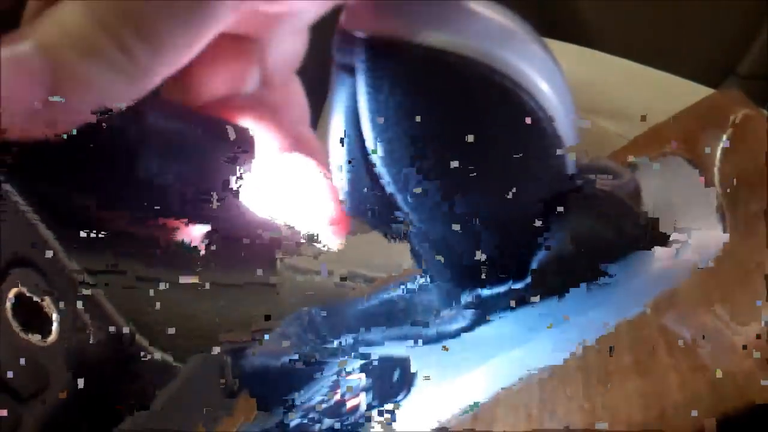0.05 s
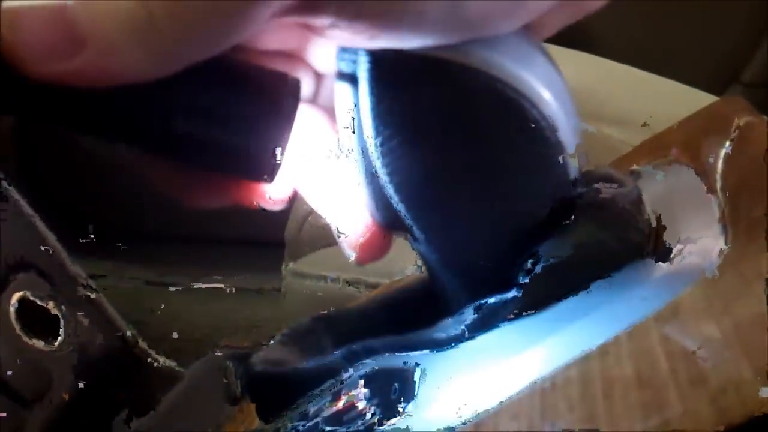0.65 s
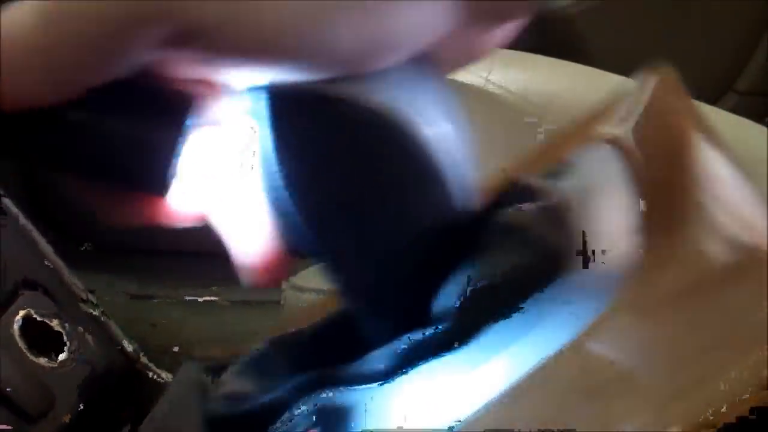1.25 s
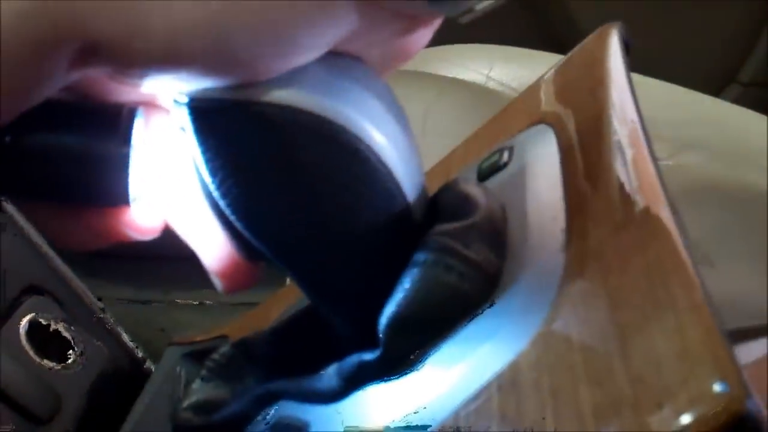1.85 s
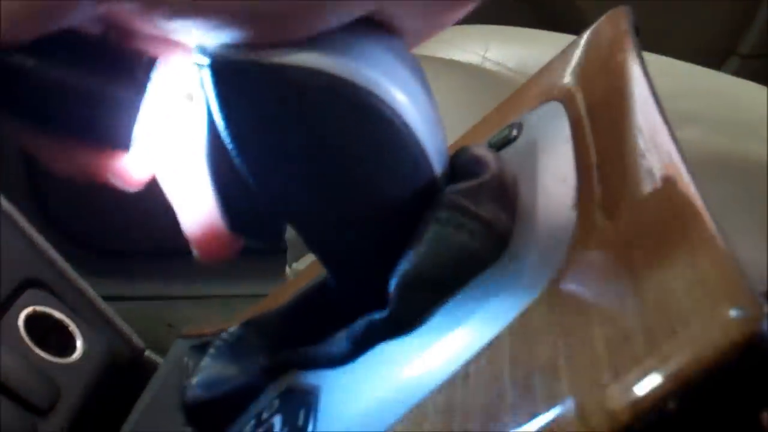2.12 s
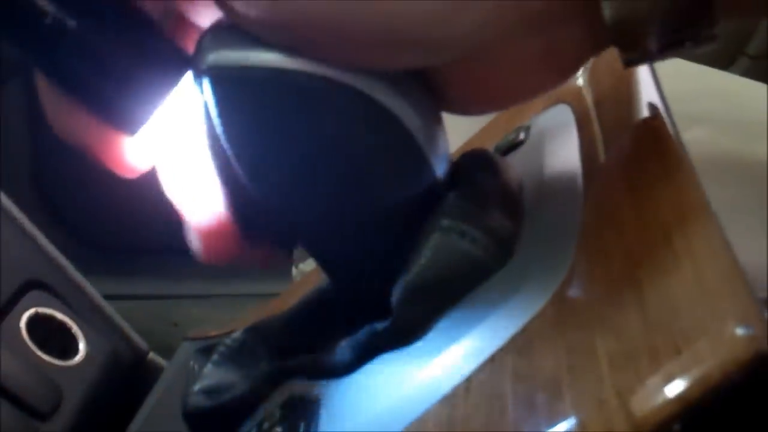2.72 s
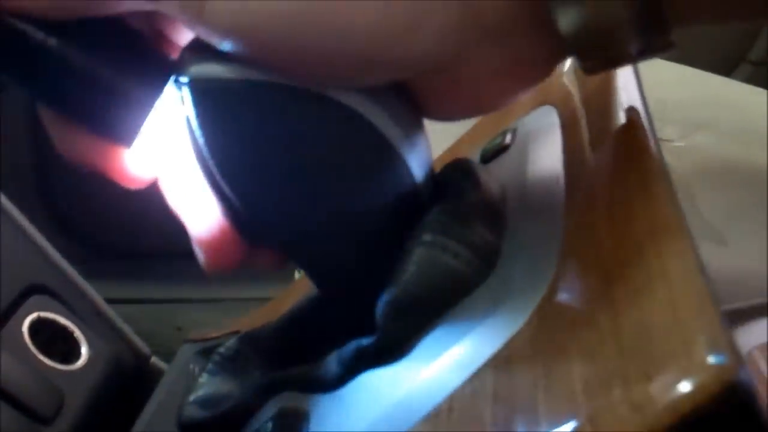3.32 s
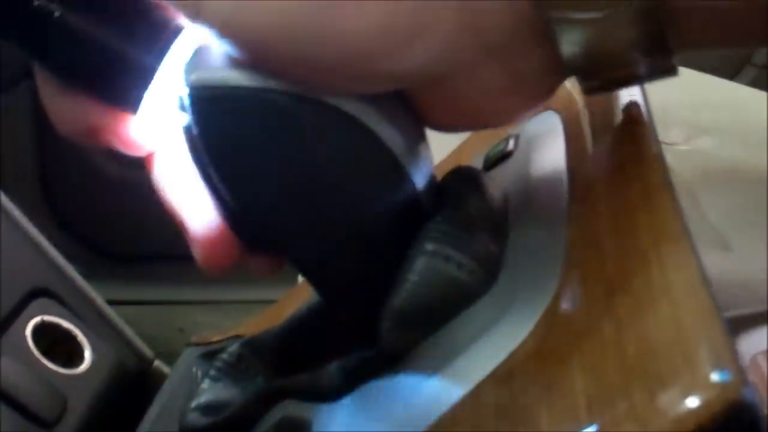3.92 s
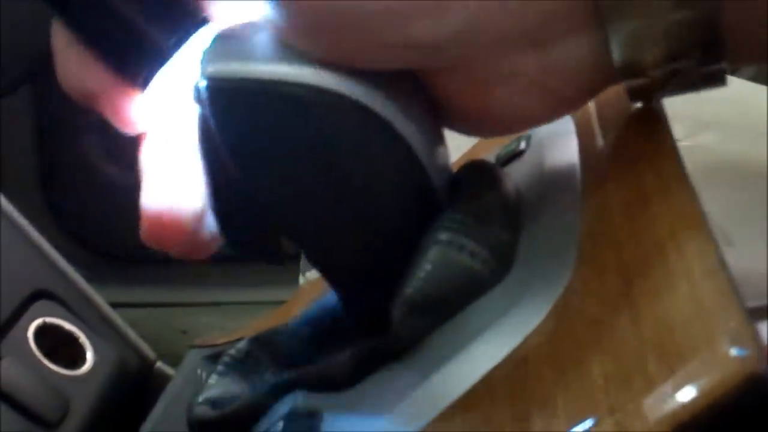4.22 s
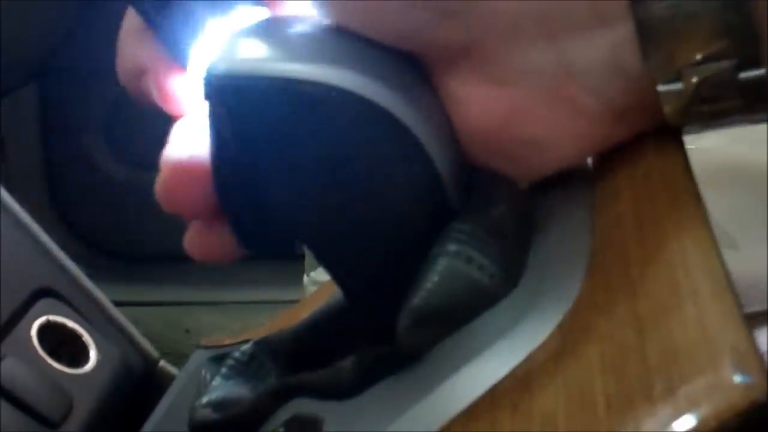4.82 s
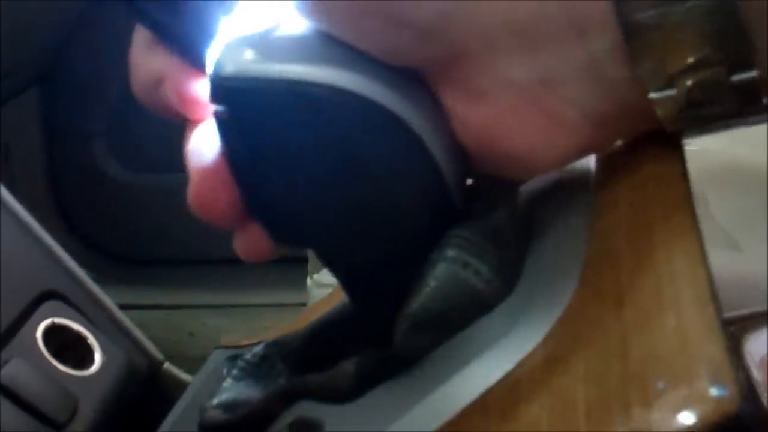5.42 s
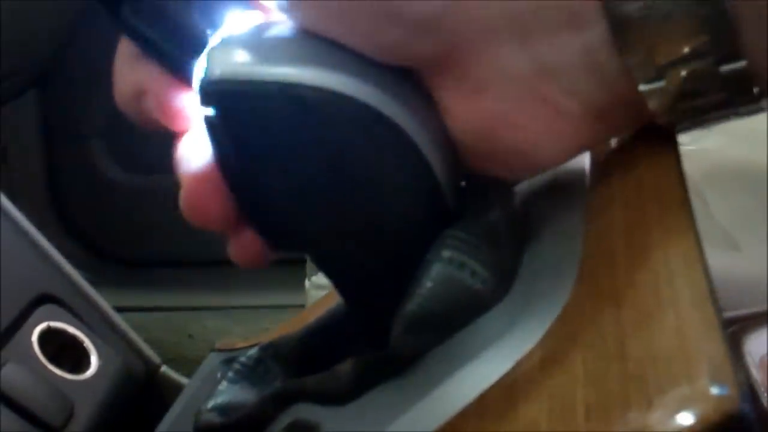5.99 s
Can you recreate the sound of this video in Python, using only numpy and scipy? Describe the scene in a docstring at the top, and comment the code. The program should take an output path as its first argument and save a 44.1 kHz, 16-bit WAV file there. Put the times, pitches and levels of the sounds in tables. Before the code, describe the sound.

A hand works the lock button of a gear lever in a parked car, close to the microphone. Light plastic ticks and sharp snaps come at uneven intervals, mixed with skin rubbing on the knob. Just after a second, a loud double click lands with a dull thump from the console. More clicks follow, growing busier near the end. The small cabin sounds dead, with faint hiss and hum.

```python
"""Gear lever lock button.

A hand works the lock button of an automatic gear lever in a parked car, close up. The plastic button
ticks as it takes up its play and snaps against its stop; hand and torch rub and bump on the knob, and
the console booms softly. The small cabin is dead, with a faint hum. The gain ducks after loud clicks."""
import sys
import numpy as np
from scipy import signal
from scipy.fft import rfft, irfft, next_fast_len
from scipy.io import wavfile
from scipy.ndimage import uniform_filter1d

SR = 44100
rng = np.random.default_rng(int(sys.argv[2]) if len(sys.argv) > 2 else 0)


def store_pcm(level_fs):
    """Save levels as 16-bit WAV."""
    pcm = np.round(np.clip(level_fs, -1, 1) * 32767).astype(np.int16)
    wavfile.write(sys.argv[1], SR, np.atleast_2d(pcm).T)


N = 266849
TIME_S = np.arange(N) / SR
CLICK_TIME_S = TIME_S[:SR // 14]

# Background hiss. Each row: frequency in Hz, relative density in dB.
AIR_SPECTRUM = [(15, -64), (25, -7.5), (264, -3), (363, -4.5), (414, 1.5), (511, -8), (569, -12), (616, -5),
                (781, -8.5), (3630, -16), (10200, -15.5), (14000, -12.5)]
# Garage hum. Each row: frequency in Hz, level in dB.
HUM_TONES = [(280, -70.5), (411, -65), (565, -65.5), (662, -89.5), (770, -73)]
# Stereo image of the noise. Each row: frequency in Hz, left-right correlation.
STEREO_CORRELATION = [(60, 0.95), (300, 0.9), (640, 0.74), (1400, 0.58), (3100, 0.16), (7000, 0)]
# Handling rumble. Each row: frequency in Hz, relative density in dB.
RUMBLE_SPECTRUM = [(15, -39.5), (30, -26), (60, -16), (90, -3.5), (130, -2.5), (270, 2), (420, -6),
                   (700, -7), (1500, -32), (4000, -23)]
# The hand shifts its grip. Each row: peak time in seconds, relative rumble level in dB.
GRIP_MOVES = [(0.73, -48), (0.8, -44.5), (1.04, -41), (1.289, -33), (1.412, -36.5), (1.66, -45),
              (1.829, -47.5), (2.052, -47), (2.191, -46), (3.301, -40.5), (4.08, -49), (4.42, -46.5),
              (5.45, -43), (5.769, -46.5)]
# Soft blows on the console. Each row: time in seconds, level in dB, knock pitch in Hz.
CONSOLE_BUMPS = [(0.207, -34.5, 250), (0.249, -48, 240), (1.051, -50, 276), (1.308, -23.5, 274),
                 (1.331, -23, 338), (1.352, -21, 334), (1.4, -31.5, 250), (1.652, -59, 129),
                 (1.857, -51.5, 85), (2.145, -47, 250), (2.215, -43.5, 85), (2.249, -40.5, 264),
                 (2.558, -42.5, 222), (3.252, -41, 560), (3.283, -38, 313), (3.549, -48.5, 288),
                 (4.814, -47, 318), (5.145, -34, 337), (5.401, -29, 412), (5.481, -33.5, 400)]
# Boom and knock bands. Each row: low edge in Hz, high edge in Hz.
BUMP_BANDS_HZ = [(60, 200), (200, 800)]
# Hand on knob and leather. Each row: peak time in seconds, length in seconds, level in dB,
# treble tilt in dB.
RUB_STROKES = [(0.395, 0.033, -37, -2.5), (0.757, 0.067, -59, 0), (1.052, 0.11, -49.5, -3),
               (1.266, 0.051, -35.5, -6), (1.305, 0.029, -19.5, -1), (1.35, 0.014, -20, -3),
               (1.411, 0.063, -40.5, -6.5), (2.175, 0.14, -48.5, 4), (3.64, 0.014, -36.5, 8.5),
               (4.419, 0.047, -40.5, -1), (4.576, 0.057, -36.5, -6), (4.728, 0.011, -48, 13),
               (5.145, 0.014, -26.5, -2), (5.392, 0.013, -35.5, 7), (5.404, 0.018, -34, -14),
               (5.486, 0.017, -29.5, -3.5), (5.756, 0.078, -56.5, 5)]
# Modes of console and cabin, lock linkage and hollow plastic knob.
# Each row: frequency in Hz, relative level in dB, T60 in seconds.
CONSOLE_RESONANCES = [(79, -1, 0.1), (127.9, 9, 0.17), (173.5, 3.5, 0.069), (209.7, 0, 0.085),
                      (274.5, -5, 0.16), (349.4, -5, 0.11), (421.5, -5.5, 0.065), (580, -1.5, 0.087),
                      (662, -8.5, 0.042)]
LINKAGE_RESONANCES = [(1024, -12, 0.0098), (1260, -2.5, 0.01), (1562, -4, 0.02), (1823, -2, 0.0093),
                      (2170, -7.5, 0.0062), (2995, -8, 0.02), (4244, -22.5, 0.03), (4770, -12, 0.018),
                      (6000, -14.5, 0.011), (7450, -3, 0.0082), (13100, -21, 0.028)]
KNOB_RESONANCES = [(1000, -17, 0.0088), (1424, 19.5, 0.0064), (1650, 5.5, 0.0058), (1700, 7.5, 0.0036),
                   (2410, -19, 0.0022), (3080, -3.5, 0.0073), (4266, 1, 0.0075), (4920, 2, 0.0077),
                   (5850, -4, 0.0086), (7300, -10.5, 0.0055), (12370, -8, 0.004), (12580, -12, 0.0064),
                   (13600, -9.5, 0.0052)]
# Body, edge, ping and crack of a click. Each row: low edge in Hz, high edge in Hz.
CLICK_BANDS_HZ = [(800, 2400), (2400, 3600), (3600, 6500), (6500, 15500)]
# Left over right in dB, per click band.
CLICK_PAN_DB = [.3, 1.6, 2.4, 3.399]
# Share of the contact hardness, per click band.
CLICK_HARDNESS_SHARE = [0, 0.3, 0.7, 1]
# Loose linkage chatter. Each row: start in seconds, gap between touches in seconds, level in dB.
LINKAGE_RATTLES = [(3.811, 0.007, -40.5), (4.033, 0.016, -40.5)]
# Light contacts of button and linkage. Each row: start in seconds, level in dB, hardness in dB,
# main ring in Hz.
BUTTON_TICKS = [(0.204, -27, 13.5, 1380), (0.2493, -29.5, 17.5, 1720), (0.3509, -40.5, -3, 4030),
                (0.383, -36.5, 9, 1280), (0.4096, -30, -14, 2230), (0.5076, -40.5, 12, 2120),
                (0.517, -43.5, -4, 1320), (0.7074, -51, 4, 1000), (0.9473, -49.5, 6, 1010),
                (1.0203, -43.5, 20, 1570), (1.0487, -34.5, 30, 1570), (1.0801, -43, 11, 1200),
                (1.239, -40, 3, 1920), (1.2998, -24.5, 11, 1290), (1.487, -44.5, 2, 1110),
                (1.782, -48, -13, 3140), (1.832, -47.5, 17, 1400), (2.0232, -43.5, -1, 1360),
                (2.1071, -36.5, 3, 1670), (2.188, -42, 4, 1550), (2.254, -34, -21, 1510),
                (2.405, -37, -7, 1550), (2.4215, -34, 9, 1630), (2.4424, -41, 4, 1570),
                (2.5216, -38.5, -7, 1910), (2.547, -36.5, -12, 1200), (2.7326, -33, -9, 1900),
                (2.8907, -32.5, 0, 1640), (3.1503, -40.5, 1, 2500), (3.1666, -30.5, 5, 3140),
                (3.2116, -31.5, -22, 2900), (3.54, -33, -2, 1980), (3.564, -42.5, 20, 1580),
                (3.6208, -38, -22, 1530), (3.641, -42.5, -17, 2300), (4.2126, -49, 6, 1840),
                (4.283, -48, 20, 1890), (4.3362, -30, 18, 2350), (4.4444, -36.5, 26, 1600),
                (4.5464, -27, -2, 1520), (4.589, -29.5, 17, 1570), (4.6606, -28.5, -2, 1110),
                (4.8019, -31, 7, 1540), (4.8459, -39.5, -10, 1580), (4.9002, -35, 1, 1630),
                (5.0109, -43, -2, 3000), (5.088, -32, 12, 1570), (5.102, -34.5, 7, 1550),
                (5.477, -31.5, 6, 1360), (5.5147, -32, 9.5, 1820), (5.5792, -40.5, -5, 1590),
                (5.7451, -36, 4.5, 1710), (5.906, -28, 1, 1430), (5.919, -32.5, 8, 1560)]
# Button and detent snapping home. Each row: start in seconds, landing delay in seconds, relative level
# in dB, hardness in dB, main ring in Hz, gain of that ring, relative housing level in dB.
BUTTON_SNAPS = [(0.3898, 0.00048, -26, 16, 1280, 0.62, -55), (1.3077, 0.00027, -21.5, -15, 1380, 0.1, -28),
                (1.346, 0.0011, -17.5, 12, 5260, 0.11, -31), (2.4732, 0.0025, -19, 8.5, 1680, 0.35, -44.5),
                (2.9138, 0.0009, -18, 5.5, 3840, 0.67, -42), (3.2513, 0.00043, -14, -5.5, 1440, 0.27, -29),
                (3.8538, 0.00083, -18, 0.5, 2610, 1.24, -45.5), (4.564, 0.00045, -16, -8, 1670, 1.7, -64),
                (4.599, 0.002, -15.5, 13.5, 1640, 0.5, -38), (4.9317, 0.0015, -18, 10.5, 1640, 0.34, -43),
                (5.9462, 0.0018, -18, 7.5, 4130, 0.4, -46)]


def from_db(db):
    return 10 ** (np.asarray(db) / 20)


def unit_rms(x):
    return x / np.sqrt(np.mean(x ** 2) + 1e-20)


def with_energy(x, db, span_s):
    """Scale x so its rms, spread over span_s, is db."""
    return x * from_db(db) * np.sqrt(span_s * SR / np.mean(np.sum(x ** 2, axis=-1)))


def pan(left_over_right_db):
    return from_db(np.array([[left_over_right_db], [-left_over_right_db]]) / 2)


def band(x, edges_hz):
    return signal.sosfilt(signal.butter(3, edges_hz, "band", fs=SR, output="sos"), x)


def fade(t, t60_s):
    return np.exp(-np.log(1000) * t / t60_s)


def swell(peak_s, rise_s, fall_s):
    """Exponential rise to 1 at peak_s, then exponential fall."""
    distance = np.maximum((peak_s - TIME_S) / rise_s, (TIME_S - peak_s) / fall_s)
    return np.exp(-np.minimum(distance, 20))


def at_hz(curve, hz):
    curve_hz, values = np.array(curve).T
    return np.interp(np.log(hz), np.log(curve_hz), values)


def add(track, start_s, sound):
    start = int(start_s * SR)
    track[:, start:start + sound.shape[-1]] += sound[..., :N - start]


def drift(rate_hz):
    """Random wander, rms 1."""
    return unit_rms(np.interp(TIME_S * rate_hz, np.arange(N), rng.standard_normal(N)))


def coloured_noise(spectrum):
    """Stereo noise, rms 1: correlated in the bass, independent in the treble."""
    size = next_fast_len(N)
    hz = np.maximum(np.fft.rfftfreq(size, 1 / SR), 1)
    mid, side = rfft(rng.standard_normal((2, size)))
    correlation = np.clip(at_hz(STEREO_CORRELATION, hz), 0, 1)
    stereo = np.sqrt(1 + correlation) * mid + np.sqrt(1 - correlation) * side * [[1], [-1]]
    rolloff_hz = 2 * spectrum[-1][0]
    gain = from_db(at_hz(spectrum, hz)) / (1 + (hz / rolloff_hz) ** 2)
    return unit_rms(irfft(stereo * gain, size)[:, :N])


def background(air_db=-52.0, waver_db=2.5):
    """Soft hiss and a wavering hum."""
    hum = np.zeros(N)
    for hz, db in HUM_TONES:
        amplitude = np.sqrt(2) * from_db(db + waver_db * drift(8.0))
        hum += amplitude * np.sin(2 * np.pi * hz * TIME_S + 1.5 * drift(17))
    return from_db(air_db) * coloured_noise(AIR_SPECTRUM) + hum


def cabin(x, early_db=-10.5, early_t60_s=0.072, late_db=-12.0, late_t60_s=0.2, late_cutoff_hz=1700):
    """Dense close reflections off the dashboard, then a tail dulled by the seats."""
    t = np.arange(SR // 3) / SR
    mid, side = rng.standard_normal((2, 2, len(t))) * (1 - np.exp(-(t / 0.0025) ** 2))
    # Long waves reach both microphones alike.
    side = signal.sosfilt(signal.butter(1, 2200, "high", fs=SR, output="sos"), side)
    early, late = np.stack([mid + side, mid - side], axis=1)
    early = with_energy(early * fade(t, early_t60_s), early_db, 1 / SR)
    late = with_energy(late * fade(t, late_t60_s), late_db, 1 / SR)
    late = signal.sosfilt(signal.butter(2, late_cutoff_hz, fs=SR, output="sos"), late)
    return x + signal.fftconvolve(x, early + late, axes=1)[:, :N]


def handling(gain_db=0.5, lumps_db=3.5, lump_rate_hz=35, rest_db=-67.0, push_db=-45.5, push_slope=0.22,
             rise_s=0.023, fall_s=0.048):
    """Lumpy rumble that swells with each grip shift and the push behind each click."""
    clicks = [(start_s, db) for start_s, _, db, *_ in BUTTON_SNAPS + LINKAGE_RATTLES]
    clicks += [(start_s, db) for start_s, db, *_ in BUTTON_TICKS]
    pushes = [(start_s + rise_s, push_db + push_slope * db) for start_s, db in clicks]
    effort = from_db(rest_db)
    for peak_s, db in GRIP_MOVES + pushes:
        effort = np.maximum(effort, from_db(db) * swell(peak_s, rise_s, fall_s))
    lumps = from_db(gain_db + lumps_db * drift(lump_rate_hz))
    return effort * lumps * coloured_noise(RUMBLE_SPECTRUM)


def bumps(rise_s=0.00233, crossover_hz=160, lean_db_per_octave=10.5, knock_db_per_octave=-13.0):
    """Soft blows ring the console and cabin air; where the hand lands sets the knock pitch."""
    out = np.zeros((2, N))
    t = np.arange(SR // 4) / SR
    hz, db, t60_s = np.array(CONSOLE_RESONANCES).T[:, :, None]
    onset = 1 - np.exp(-t / rise_s)
    for time_s, level_db, knock_hz in CONSOLE_BUMPS:
        strength, detune, start_cycles = rng.standard_normal((3, len(hz), 1))
        phase = 2 * np.pi * (hz * (1 + 0.044 * detune) * t + start_cycles)
        mic_phase = 0.16 * rng.standard_normal((2, len(hz), 1))
        modes = from_db(db + 2 * strength) * fade(t, t60_s) * np.sin(phase + mic_phase) * onset
        knock_weights = from_db(knock_db_per_octave * np.abs(np.log2(hz / knock_hz)))
        boom = band(modes.sum(axis=1), BUMP_BANDS_HZ[0])
        knock = band((modes * knock_weights).sum(axis=1), BUMP_BANDS_HZ[1])
        # Mostly boom below the crossover, mostly knock above.
        lean_db = lean_db_per_octave * np.log2(knock_hz / crossover_hz)
        boom = with_energy(boom, level_db - max(lean_db, 0), span_s=0.038)
        knock = with_energy(knock, level_db + min(lean_db, 0), span_s=0.035)
        add(out, time_s - rise_s, boom + knock)
    return out


def rubs(grain_db=3.5, grain_rate_hz=700, rise_share=0.37):
    """Skin and leather stick and slip: grainy friction that swells and dies with each stroke."""
    _, _, db, tilt_db = np.array(RUB_STROKES).T
    strokes = np.array([swell(peak_s, rise_share * length_s, (1 - rise_share) * length_s)
                        for peak_s, length_s, *_ in RUB_STROKES])
    scuff = coloured_noise([(300, -4), (650, -1.5), (1000, 7), (1600, 1.0), (3000, 2.5), (5000, -11),
                            (14000, -35)])
    hiss = coloured_noise([(1200, -27), (3000, -12), (5500, -3), (9000, -2.0), (14000, 2)])
    friction = scuff * (from_db(db) @ strokes) + hiss * (from_db(db + tilt_db) @ strokes)
    slips = np.minimum(drift(grain_rate_hz), 2)   # a slip can only release so much
    return friction * from_db(grain_db * slips) * pan(1.4)


def contact(modes, dense_db, dense_t60_s, grip_detune, rise_s, spread_db=4.5):
    """One contact: the part's modes, detuned by the grip, plus a burst of dense short ones."""
    t = CLICK_TIME_S
    hz, db, t60_s = np.array(modes).T[:, :, None]
    strength, detune, skew = rng.standard_normal((3, len(hz), 1))
    phase = 2 * np.pi * hz * (1 + grip_detune * detune) * t + np.pi * rng.integers(0, 2, hz.shape)
    amplitude = from_db(db + spread_db * strength) * fade(t, t60_s)
    mic_phase = skew * hz / 8000   # short waves reach the microphones out of step
    ring = np.array([np.sum(amplitude * np.sin(phase + sign * mic_phase), axis=0) for sign in (1, -1)])
    mid, side = rng.standard_normal((2, len(t)))
    dense = mid + 0.46 * np.diff(side, prepend=0) * np.array([[1], [-1]])
    return (ring + from_db(dense_db) * dense * fade(t, dense_t60_s)) * (1 - np.exp(-t / rise_s))


def contact_tone(ring, db, hardness_db, ring_hz, ring_gain, db_per_octave, relative_bandwidth=0.13):
    """The contact point favours one ring and nearby bands; a harder contact lifts the treble."""
    centres_hz = np.sqrt(np.prod(CLICK_BANDS_HZ, axis=1))
    octaves_away = np.abs(np.log2(centres_hz / ring_hz))
    levels_db = hardness_db * np.array(CLICK_HARDNESS_SHARE) + db_per_octave * octaves_away
    click = sum(with_energy(band(ring, edges_hz), band_db, span_s=1) * pan(pan_db)
                for edges_hz, band_db, pan_db in zip(CLICK_BANDS_HZ, levels_db, CLICK_PAN_DB))
    main_ring = signal.lfilter(*signal.iirpeak(ring_hz, 1 / relative_bandwidth, fs=SR), click)
    return with_energy(click + ring_gain * main_ring, db, span_s=0.01)


def housing(db, thud_t60_s, thud_db=-4.5, knock_hz=950, knock_t60_s=0.02):
    """A click passes down the lever: the casing knocks, the console thuds."""
    t = CLICK_TIME_S
    knock = np.sin(2 * np.pi * knock_hz * t) * fade(t, knock_t60_s)
    noise = unit_rms(band(rng.standard_normal(len(t)), (300, 1100)))
    thud = from_db(thud_db) * noise * fade(t, thud_t60_s)
    return with_energy(knock + thud, db, span_s=0.01)


def stray_touches(count=2, scatter_s=0.05, level_db=-51.0, hardness_db=11.0, ring_hz=1050):
    """Tick rows: each grip shift jogs faint ticks out of the lever."""
    return [(peak_s + scatter_s * jitter, level_db + 0.5 * strength,
             hardness_db, ring_hz * 2 ** (0.17 * detune))
            for peak_s, _ in GRIP_MOVES
            for jitter, strength, detune in rng.standard_normal((count, 3))]


def rattle_touches(count=4, hardness_db=-9.5, ring_hz=1650):
    """Tick rows: the loose linkage chatters in dull, nearly even runs."""
    return [(start_s + gap_s * (k + 0.13 * jitter), db + 2.0 * strength,
             hardness_db, ring_hz * 2 ** (0.23 * detune))
            for start_s, gap_s, db in LINKAGE_RATTLES
            for k, (jitter, strength, detune) in enumerate(rng.standard_normal((count, 3)))]


def ticks(housing_gain_db=-15.0):
    """Single contacts as button and linkage take up their play."""
    out = np.zeros((2, N))
    for start_s, db, hardness_db, ring_hz in BUTTON_TICKS + rattle_touches() + stray_touches():
        ring = contact(LINKAGE_RESONANCES, dense_db=0.0, dense_t60_s=0.013,
                       grip_detune=0.047, rise_s=0.00024)
        ring_gain = 0.42 * (ring_hz / 1500) ** 2   # high rings stand out more
        click = contact_tone(ring, db, hardness_db, ring_hz, ring_gain, db_per_octave=-7.0)
        add(out, start_s, click + housing(db + housing_gain_db, thud_t60_s=0.092))
    return out


def snaps(gain_db=1.5, touch_db=-8.0, housing_gain_db=4.0):
    """The button touches its stop lightly, then lands fully, ringing the hollow knob."""
    out = np.zeros((2, N))
    for start_s, delay_s, db, hardness_db, ring_hz, ring_gain, housing_db in BUTTON_SNAPS:
        touch = contact(KNOB_RESONANCES, dense_db=0.0, dense_t60_s=0.017,
                        grip_detune=0.0092, rise_s=0.000095)
        landing = contact(KNOB_RESONANCES, dense_db=-8.5, dense_t60_s=0.02,
                          grip_detune=0.022, rise_s=0.000069)
        landing = np.pad(landing, ((0, 0), (int(delay_s * SR), 0)))[:, :len(CLICK_TIME_S)]
        ring = from_db(touch_db) * touch + landing
        click = contact_tone(ring, db, hardness_db, ring_hz, ring_gain, db_per_octave=-1.0)
        add(out, start_s, click + housing(housing_db + housing_gain_db, thud_t60_s=0.047))
    return from_db(gain_db) * out


def scene():
    """Clicks in the cabin over hand noise, hiss and hum."""
    return cabin(snaps() + ticks()) + rubs() + bumps() + handling() + background()


def gain_control(x, threshold_db=-26.5, slope=0.32, release_db_per_s=82.0, attack_s=0.022):
    """Gain ducks just after loud sounds, then recovers."""
    power = uniform_filter1d(np.mean(x ** 2, axis=0), SR // 500)
    level_db = 10 * np.log10(np.maximum(power, 1e-12))
    over_db = np.maximum(level_db - threshold_db, 0)
    release_db = release_db_per_s * TIME_S
    held_db = np.maximum.accumulate(over_db + release_db) - release_db
    pole = np.exp(-1 / (attack_s * SR))
    return x * from_db(-slope * signal.lfilter([1 - pole], [1, -pole], held_db))


def record(dry):
    """Gain control, hard clip, steep low-pass."""
    ceiling, cutoff_hz = 0.85, 14400
    clipped = np.clip(gain_control(dry), -ceiling, ceiling)
    return signal.sosfilt(signal.ellip(10, 0.3, 70, cutoff_hz, fs=SR, output="sos"), clipped)


dry = scene()
out = record(dry)
store_pcm(out)
```